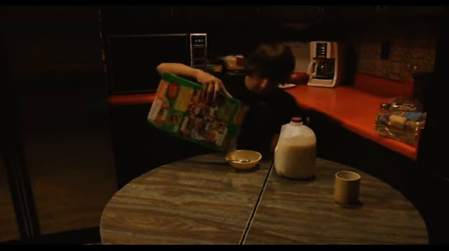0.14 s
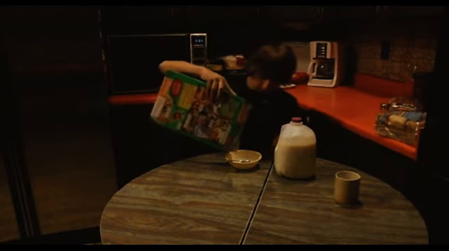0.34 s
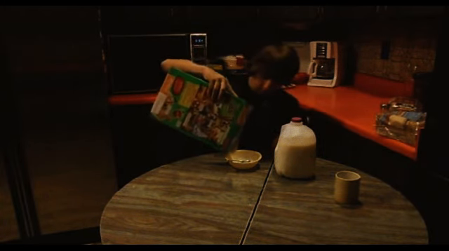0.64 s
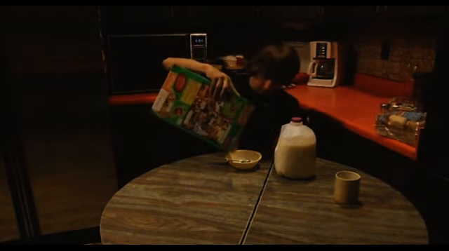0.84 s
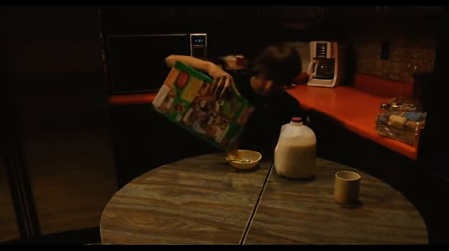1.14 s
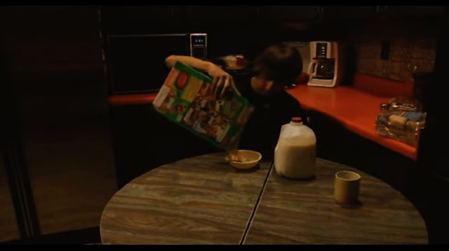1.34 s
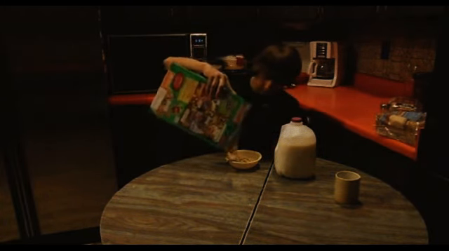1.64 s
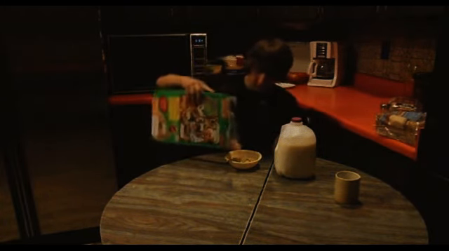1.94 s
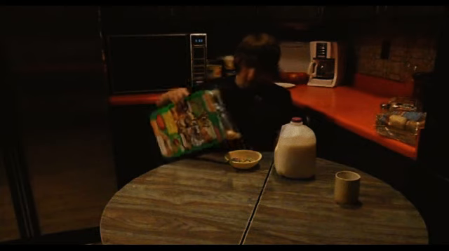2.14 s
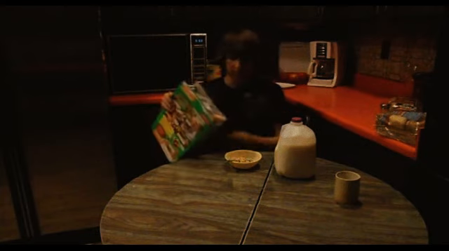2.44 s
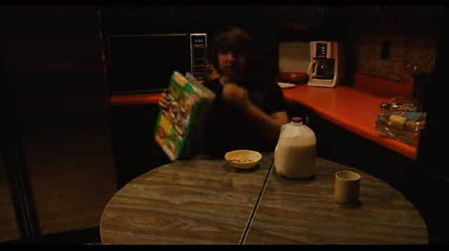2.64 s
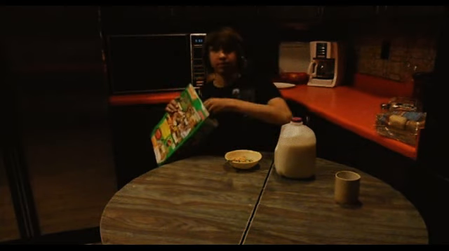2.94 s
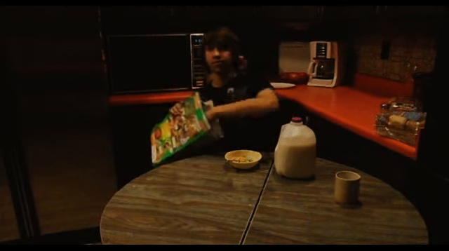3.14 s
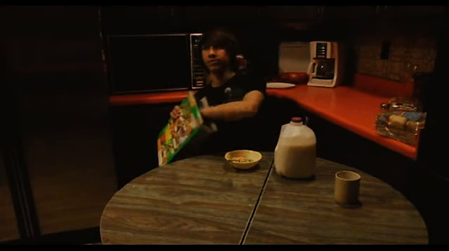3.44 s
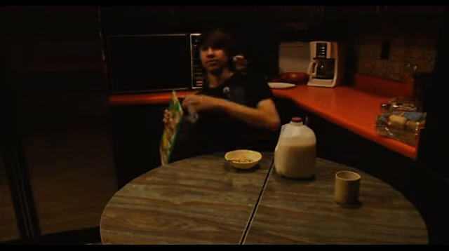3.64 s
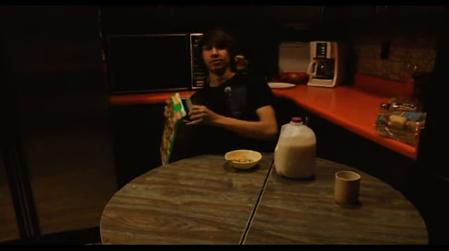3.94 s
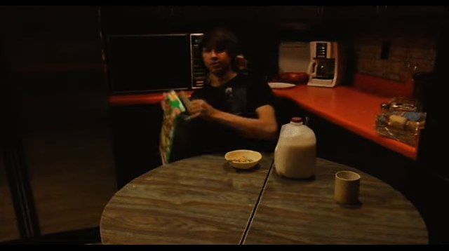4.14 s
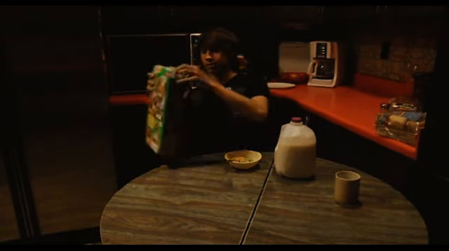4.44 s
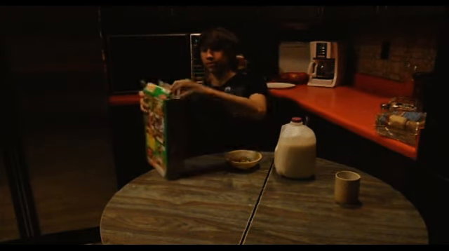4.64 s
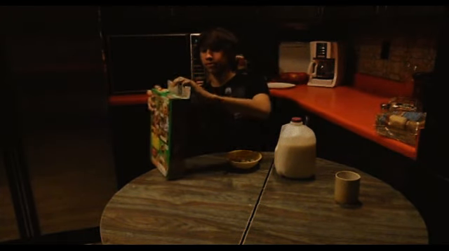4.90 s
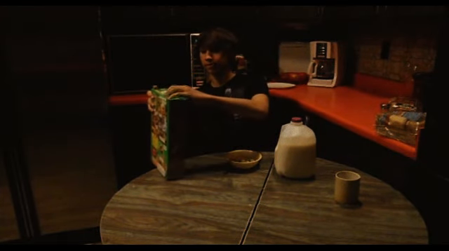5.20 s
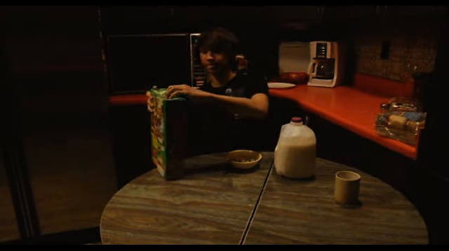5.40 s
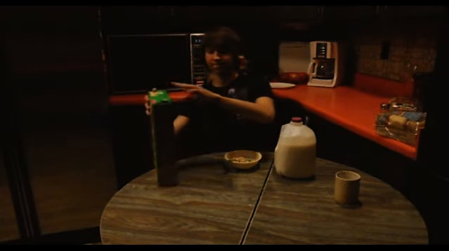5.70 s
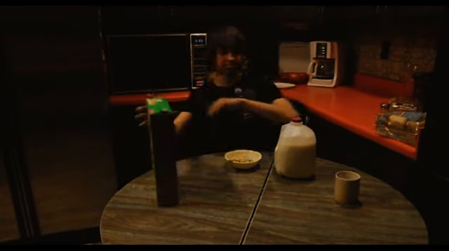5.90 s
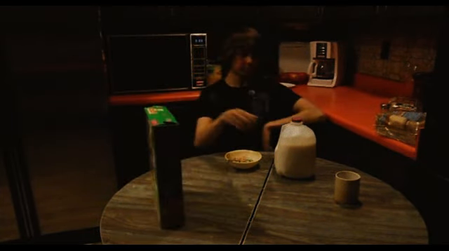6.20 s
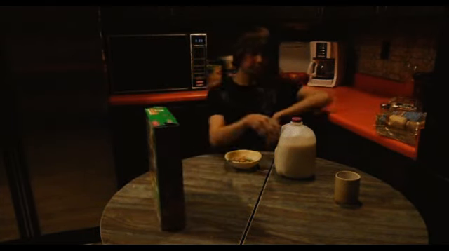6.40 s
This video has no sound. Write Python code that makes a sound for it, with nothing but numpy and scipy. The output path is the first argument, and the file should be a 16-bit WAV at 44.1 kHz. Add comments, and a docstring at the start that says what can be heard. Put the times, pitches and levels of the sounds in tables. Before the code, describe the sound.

In a small kitchen, dry cereal slides down a cardboard box in uneven shakes, pattering and clinking into a ceramic bowl. The stiff liner bag rustles and crackles, the box is tapped, then knocked hard on the table with an overloaded crack. Flaps pop shut, the box scrapes aside, and a steady, bright ringing hiss begins abruptly. The microphone is fairly near, with short room reflections.

```python
"""Cereal poured into a bowl

Dry cereal slides from a cardboard box and patters into a small ceramic bowl in a kitchen.
The liner bag is rustled back in, the box is knocked down on the table, shut and pushed aside.
A bright, ringing hiss sets in at the end. Random small impacts excite the cardboard, heap, bag and bowl;
short decaying modes give bowl, box, flaps and table their pitch. The sum clips at full scale."""
import sys
import numpy as np
from scipy import signal
from scipy.fft import rfft, irfft
from scipy.io import wavfile

SR = 44100
rng = np.random.default_rng(int(sys.argv[2]) if len(sys.argv) > 2 else 0)


def int16_out(signal):
    """Quantize to a 16-bit WAV file."""
    q = np.round(np.clip(np.atleast_2d(signal).T, -1, 1) * 32767)
    wavfile.write(sys.argv[1], SR, q.astype(np.int16))


N = 289279

# The stream of cereal onto the heap. Each row: time in seconds, relative patter level in dB.
STREAM = [(0, -29), (.09, -31), (.14, -46), (.25, -31.5), (.35, -34), (.45, -34), (.55, -36.5),
          (.72, -31.5), (.83, -37), (1.05, -32), (1.35, -28), (1.8, -31.5), (2.2, -30.5), (2.45, -45)]
# Shakes that send cereal down the box. Each row: start in seconds, length in seconds, slide level in dB.
SHAKES = [(-.03, 0.098, -25.5), (0.549, 0.029, -33), (0.7, 0.055, -33), (0.843, 0.044, -29.5),
          (1.026, 0.038, -32), (1.21, 0.034, -29.5), (1.86, 0.047, -49), (2.262, 0.091, -34)]
# Dull noise of moving arms and box. Each row: time in seconds, relative level in dB.
MOVEMENT = [(0.0, -44), (0.38, -55.5), (0.86, -49), (1.66, -57.5), (2.78, -41.5), (3.87, -52.5),
            (4.05, -45), (4.62, -47.5), (4.82, -54), (6.56, -39.5)]
# Clumps landing in the bowl. Each row: time in seconds, settling time in seconds, relative crunch in dB,
# relative ring in dB, how far the spot struck favours the lowest mode in dB, rough pitch of that mode in Hz.
LANDINGS = [(0.1099, 0.0032, 4.5, -18.5, 6.5, 3040), (0.1562, 0.004, -3, -21.5, -1, 2970),
            (0.1829, 0.0064, -3, -27, 9.5, 3080), (0.5799, .005, -7, -25.5, 3, 3190),
            (0.8529, 0.0088, 1.5, -16, 3, 3070), (0.8599, 0.0073, -2, -25, 9.5, 3057),
            (0.9044, 0.018, -7, -21.5, 3, 3100), (0.9914, 0.0052, 0, -17.5, 2, 3080),
            (1.1246, 0.0041, -1, -16.5, 4.5, 3110), (1.1967, 0.0082, -7.5, -24.5, 4, 3160),
            (1.228, 0.009, -20, -31, 0, 3220), (1.28, 0.007, -18, -15, 6, 3076),
            (1.289, 0.015, 3, -17.5, 8, 3040), (1.3137, 0.0087, -8, -24, 0, 3070),
            (1.325, 0.0073, -9, -25, -1, 3200), (1.3766, 0.024, -16, -25, 2, 3330),
            (1.455, 0.014, -3, -20, 1.5, 3120), (1.4658, 0.015, -8, -20.5, -1.5, 3130),
            (1.481, 0.038, -4, -21, 3, 3320), (1.557, 0.011, -13, -27, 3, 3200),
            (1.6138, .005, -9, -29, -1, 3220), (1.6575, 0.023, -6.5, -26.5, 3, 3050),
            (1.6834, 0.018, -6, -23.5, 2.5, 3400), (1.808, 0.0058, -13, -27.5, 3, 3170),
            (1.853, 0.008, -6, -27.5, 5, 3080), (1.88, 0.0067, -16, -29, 2, 3320),
            (2.277, 0.003, -4.5, -24, 1, 3250), (2.3133, 0.006, -15, -32, -4, 3180),
            (4.693, 0.0067, -18, -34, -7, 3040), (4.744, 0.024, -27, -46, 10, 3040)]
# Bowl modes, damped by the heap. Each row: frequency in Hz, relative level in dB, t60 in seconds,
# group (0 lowest, 1 second, 2 upper modes). Landings vary the pitch and t60.
BOWL_MODES = [(3080, -5, 0.062, 0), (3108, -13, 0.05, 0), (3260, -21.5, 0.055, 0), (3350, -24, 0.043, 0),
              (4250, -6.5, 0.11, 1), (4796, 1, 0.11, 1), (4810, -7.5, 0.065, 1), (5930, -23, 0.051, 2),
              (6853, -0.5, 0.096, 2), (6770, -7.5, 0.063, 2), (8600, -22, 0.067, 2),
              (9110, -11.5, 0.094, 2)]
# Sharp cracks of flakes, bag and box, and the overloaded crackle of the big knock.
# Each row: time in seconds, relative level in dB, centre in Hz.
CRACKS = [(0.185, -1.5, 6450), (.3076, -19, 7100), (0.3653, -15, 6940), (0.3883, -5, 7000),
          (0.397, -7, 6160), (0.454, -20, 5000), (0.645, -12.5, 6040), (0.715, -8, 6130),
          (.9112, -12, 6000), (0.926, -16, 7500), (1.018, -9, 4500), (1.124, -8, 7500), (1.3278, 1, 6100),
          (1.391, -2.5, 6050), (1.4964, -4, 6000), (1.664, -10, 6540), (2.0065, -15.5, 4500),
          (2.095, -15, 4500), (2.313, -9, 7150), (2.5853, 1.5, 3980), (2.762, -14, 2500), (2.869, -4, 3000),
          (2.896, 1.5, 3500), (3.0289, 3.5, 3750), (3.068, 0, 4530), (3.1138, -3, 4630), (3.131, -10, 3000),
          (3.159, -4, 3500), (3.338, 2.5, 3530), (3.388, 1, 3000), (3.2351, 1.5, 2610), (3.268, 1.5, 5600),
          (3.5669, -10, 3480), (3.625, -0.5, 3130), (3.642, -4, 3480), (3.8353, -7, 3500),
          (3.9383, -6.5, 5000), (4.0415, -10, 2990), (4.0767, -18, 3000), (4.1596, -2, 4030),
          (4.6741, 7.5, 6900), (5.043, -17, 4600), (5.495, -18, 4440)]
# Brief faint whistles, swishes and scuffs of sliding cereal and rubbed box. Each row: time of the middle
# in seconds, time from there to 1/e in seconds, pitch at the middle in Hz, width in Hz,
# level at the middle in dB, glide in Hz per second.
WHISTLES = [(1.917, 0.16, 1245, 101, -39, 0), (2.03, 0.04, 1800, 130, -36, 498),
            (2.128, 0.058, 1850, 75, -29.5, 250), (2.233, 0.077, 1796, 180, -34.5, -900),
            (2.173, 0.16, 3310, 600, -36, 0), (2.172, 0.15, 4490, 500, -37, -600),
            (2.809, 0.047, 830, 200, -27, 0), (3.894, 0.024, 728, 403, -28.5, 0),
            (4.401, 0.11, 1288, 690, -31, 0), (4.658, 0.018, 1197, 900, -21.5, -4),
            (5.697, 0.033, 554, 100, -23, 500), (5.721, 0.054, 1034, 190, -26, 600)]
# Movements of the hands on box and liner. Each row: start in seconds, length in seconds,
# relative rub in dB, relative crinkle in dB.
HAND_STROKES = [(2.495, .08, -27, -27), (2.562, 0.093, -25, -19.5), (2.643, 0.088, -22.5, -20),
                (2.854, 0.07, -21.5, -17.5), (3.023, 0.029, -24.5, -19), (3.109, 0.023, -24, -18.5),
                (3.217, 0.18, -28, -16.5), (3.289, 0.058, -21.5, -8.5), (3.577, 0.062, -37.5, -25),
                (3.841, 0.071, -28, -26), (4.151, 0.026, -27.5, -23), (4.287, 0.17, -29.5, -35.5),
                (4.487, 0.12, -29.5, -32.5), (4.608, 0.02, -25, -22.5), (4.955, 0.078, -37, -49),
                (5.141, 0.09, -32, -40), (5.33, 0.41, -39.5, -48)]
# Standing waves of the hollow box. Each row: frequency in Hz, relative strength in dB.
CAVITY_WAVES = [(463, -6.5), (515, -5.5), (555, 1.5), (660, 0.5), (722, -6), (812, 0.5), (930, -4),
                (1055, -7), (1150, -1.5), (1535, -0.5), (1970, -5), (2408, -5.5)]
# Blows on the box. Each row: time in seconds, slap of the cardboard in dB, snap of its edge in dB,
# boom of its walls in dB.
KNOCKS = [(2.7615, -17, -41, -22.5), (2.779, -21, -35, -31), (3.3904, -23.5, -35, -20.5),
          (4.1585, -21, -22.5, -38), (4.177, -22, -25, -49), (4.354, -20.5, -29.5, -41),
          (4.3751, -21.5, -32, -36), (4.4105, -16, -33, -32), (4.45, -23.5, -35, -38),
          (4.6271, -20, -27, -34), (4.675, -6, -10.5, -8.5), (4.6836, -15.5, -24, -11),
          (4.695, -23, -39, -15.5), (4.964, -30.5, -38, -59)]
# Box modes, retuned a little at each blow. Each row: rough frequency in Hz, relative level in dB,
# t60 in seconds.
BOX_MODES = [(290, -6.5, 0.052), (429, -6, 0.1), (464.4, 10, 0.056), (540, 0.5, 0.042), (727, 6, 0.19),
             (1190, 4, 0.099), (1260, -30, 0.097), (1994, -13, 0.099)]
# Table top modes. Each row: frequency in Hz, relative level in dB, t60 in seconds.
TABLE_MODES = [(42, -2, .06), (88, 7, 0.041), (119, 3, 0.19), (182, 3, 0.28), (253, 6, 0.056)]
# Lid flaps pressed shut. Each row: time in seconds, hollow pock in dB, snap of the edge in dB.
FLAP_PRESSES = [(5.1834, -13.5, -17.5), (5.344, -29, -38.5), (5.633, -18.5, -19.5), (5.692, -22, -20)]
# Flap modes. Each row: frequency in Hz, relative level in dB, t60 in seconds.
FLAP_MODES = [(347, -16, 0.35), (480, -1, 0.066), (518, 6, 0.066), (757, -3, 0.13), (985, -5, .06),
              (1090, -9, 0.089), (1556, -4, 0.059), (1680, -16, 0.074), (2320, -14, 0.05)]
# Box pushed over the table, then the arm brushing back. Each row: time in seconds, relative scraping in dB.
PUSH = [(5.76, -31.5), (5.85, -22.5), (5.95, -20), (6.07, -24.5), (6.22, -25.5), (6.35, -30)]
# Narrow resonances of the closing hiss. Each row: frequency in Hz, width in Hz, relative level in dB.
HISS_PEAKS = [(1228, 34, -1), (1726, 29, 0), (2040, 55, -2), (2500, 74, -4), (2920, 54, -2), (3020, 35, -7),
              (3733, 14, 3.5), (4030, 47, 2), (4300, 81, -3), (4850, 48, 2.5), (5420, 33, 0),
              (5940, 80, -15), (6160, 47, -2), (6700, 90, -12), (7470, 66, 0), (8700, 130, -13),
              (9150, 80, -12)]

# Spectrum of drumming box walls. Each row: frequency in Hz, relative level in dB.
CARDBOARD_COLOUR = [(60, -65), (150, -28), (300, -10.5), (470, -1), (620, -1), (800, 0), (1200, -2),
                    (1700, -2.5), (2400, -8.5), (4000, -12.5), (9000, -40), (12000, -103)]
# Filter curve for the patter on the heap, with little above 10 kHz.
# Each row: frequency in Hz, relative level in dB.
HEAP_COLOUR = [(100, -39), (800, -4.5), (1800, -3.5), (2600, -1.5), (3400, 4), (4200, 2.5), (6000, -1.5),
               (7500, -9.5), (10000, -21), (11000, -64), (15000, -59)]
# Spectrum of dull arm noise. Each row: frequency in Hz, relative level in dB.
RUMBLE_COLOUR = [(25, -10), (90, -14.5), (140, -1.5), (185, 8.5), (260, 6), (400, 6.5), (900, -25),
                 (3000, -59)]
# Filter curve for crunching clumps. Each row: frequency in Hz, relative level in dB.
CRUNCH_COLOUR = [(100, -50), (600, 1), (1500, 6.5), (2500, 4.5), (4000, 0), (6000, 3.5), (7500, -4),
                 (10000, -1.5), (15000, -114)]
# Filter curve for cracking ticks. Each row: frequency in Hz, relative level in dB.
TICK_COLOUR = [(300, 6), (3000, -1), (6000, -3), (9500, -10.5), (11000, -32), (15000, -49)]
# Filter curve for the crinkling liner. Each row: frequency in Hz, relative level in dB.
CRINKLE_COLOUR = [(100, -45), (700, -18), (1500, -2.5), (2200, 1.5), (3300, 1), (4800, 0.5), (6500, -7.5),
                  (8500, -13.5), (10000, -29), (15000, -71)]
# Filter curve for slapped cardboard. Each row: frequency in Hz, relative level in dB.
SLAP_COLOUR = [(80, -28), (150, -13.5), (330, -10), (500, 1), (750, 5.5), (1100, 5.5), (1350, 0.5),
               (1650, 2.5), (2400, -5), (4000, -10.5), (9000, -55), (12000, -81)]
# Filter curve for a snapping edge. Each row: frequency in Hz, relative level in dB.
SNAP_COLOUR = [(100, -35), (600, -8), (1800, -1), (2700, 1.5), (5000, -3), (7500, -13.5), (10000, -29.5),
               (15000, -81)]
# Filter curve for the scrape on the table. Each row: frequency in Hz, relative level in dB.
SCRAPE_COLOUR = [(100, -58), (700, -20), (1600, -6.5), (2800, -1.5), (4500, 1), (6000, -5), (8000, -10),
                 (10000, -24), (15000, -42)]
# Filter curve for the closing hiss. Each row: frequency in Hz, relative level in dB.
HISS_COLOUR = [(80, -63), (300, -15), (900, -5), (1700, -3), (2600, -1), (4000, -2.5), (5200, -7),
               (6200, -9), (7400, -8), (8300, -20), (10000, -37), (15000, -37)]

T = np.arange(N) / SR
AGE = T[:SR // 3]  # time since a hit, s

KITCHEN_T60_S, KITCHEN_DB = 0.28, 7.5  # echo energy relative to the direct sound
NEAR_T60_S, NEAR_DB = 0.033, 2.5  # table top, counter and near walls answer quickly
STROKE_ATTACK_S, STROKE_RELEASE_S = 0.018, 0.089  # linear rise, time constant of the decay
SLIDE_DB = -6  # steady sliding in the box, relative to the stream
SHAKE_PATTER_DB = 0.5  # extra patter that a shake brings, relative to its slide
PATTER_DB, PING_DB = -3.0, -18.5  # pieces on the heap, stray pieces on the bowl
ARMS_DB, SHUDDER_DB = 3.5, -17.5  # relative to the movement
LEAN_S, LEAN_LENGTH_S, LEAN_DB = 2.5, 0.077, -54  # the table shudders as it is leant on
BOWL_DIRECT_DB = -9.5  # extra direct sound from the bowl
UPPER_RING_DB = -6  # upper modes relative to the ring
RING_TRIM_DB, CRUNCH_TRIM_DB, CRACK_TRIM_DB = -4.0, -23.5, -24.0
# the hands never quite rest: a light rub from taking hold until the box has been pushed aside,
# more rub and crinkle until the bag is in
GRIP_S, BAG_IN_S, PUSHED_S = 2.42, 4.66, 6.2
GRIP_RUB_DB, BAG_RUB_DB, BAG_CRINKLE_DB, GRIP_CRINKLE_DB = -40, -35, -32.5, -43.5
CRACKLE_MAX_DB = 6  # ceiling on the crackle before its trim
BUCKLE_DB, CRUMPLE_DB, CRINKLE_DB = -2.5, -13.0, -4.5
CAVITY_WIDTH_HZ, CAVITY_TRIM_DB = 11.8, -1.08
KNOCK_SETTLE_S, SNAP_SETTLE_S = 0.015, 0.0023  # how long walls and edge keep making contact
THUMP_S, THUMP_DB = 4.675, -20  # the table top under the big knock
FLAP_SETTLE_S, FLAP_DIRECT_DB = 0.0081, -2
FLAP_PAPER_DB = -6  # papery slap of a flap relative to its pock
PUSH_RUB_DB, PUSH_RUB_SHARE = -27.5, 0.46  # rub at the mean scrape; its dB per dB of scrape
HISS_S, HISS_DB, HISS_RING_DB = 6.357, -24, -23
TOP_HZ = 15700


def undb(db):
    """Decibels to gain."""
    return 10 ** (np.asarray(db) / 20)


def unit(x):
    """Scale to unit energy."""
    return x / np.sqrt(np.sum(x ** 2) + 1e-18)


def level(x, db):
    """Scale to an rms level."""
    return unit(x) * np.sqrt(len(x)) * undb(db)


def burst(x, db):
    """Scale a hit to the rms level it would have if packed into one fiftieth of a second."""
    return unit(x) * np.sqrt(SR / 50) * undb(db)


def through(x, response):
    """Pass a sound through an impulse response."""
    return signal.fftconvolve(x, response)[:len(x)]


def add(out, s, x):
    """Mix a sound in at a time in seconds."""
    i = max(int(s * SR), 0)
    out[i:i + len(x)] += x[:N - i]


def gains(table):
    """The dB column of a (time, dB) curve as a gain that fades just outside its span."""
    s, db = np.transpose(table)
    outside = np.maximum(s[0] - T, 0) + np.maximum(T - s[-1], 0)
    return undb(np.interp(T, s, db)) * np.exp(-outside / 0.037)


def colour(points, size=2048):
    """Short causal response with a spectrum of (Hz, dB) points, made minimum-phase by its cepstrum."""
    hz, db = np.transpose(points)
    bins = np.maximum(np.arange(size // 2 + 1) * SR / size, 1)
    curve_db = np.interp(np.log(bins), np.log(hz), db)
    cepstrum = irfft(np.log(undb(curve_db)))
    cepstrum[1:size // 2] *= 2
    cepstrum[size // 2 + 1:] = 0
    return unit(irfft(np.exp(rfft(cepstrum))))


def fade(t60):
    """Exponential decay by 60 dB in t60 seconds."""
    return np.exp(-np.log(1000) * AGE / t60)


def mode(hz, t60):
    """One decaying resonance; a small body radiates little below its pitch."""
    ring = np.sin(2 * np.pi * hz * AGE) * fade(t60)
    pole = np.exp(-np.pi * hz / SR)
    return unit(signal.lfilter([1, -2, 1], [1, -2 * pole, pole ** 2], ring))


def grains(per_s, spread_db):
    """Random tiny impacts of uneven size, rms 1."""
    sizes = undb(spread_db * np.clip(rng.standard_normal(N), -2, 2)) * rng.choice([-1, 1], N)
    return level(sizes * (rng.random(N) < per_s / SR), 0)


def clump(settle_s, per_s, follow_db):
    """A first contact and the smaller ones that tumble after it."""
    hits = rng.standard_normal(len(AGE)) * (rng.random(len(AGE)) < per_s / SR)
    contacts = undb(follow_db) * unit(hits * np.exp(-AGE / max(settle_s, .001)))
    contacts[0] += 1
    return contacts


def kitchen(contacts):
    """Contacts and their reflections; each comes from a new spot, so the echoes form a dense, even wash."""
    tail = fade(KITCHEN_T60_S) * (1 - np.exp(-AGE / 0.00043))
    room_energy = (undb(KITCHEN_DB) * unit(tail)) ** 2
    near_energy = (undb(NEAR_DB) * unit(fade(NEAR_T60_S))) ** 2
    echoes = room_energy + near_energy
    wash = np.sqrt(np.abs(through(contacts ** 2, echoes))) * rng.standard_normal(len(contacts))
    return (contacts + wash) / np.sqrt(1 + np.sum(echoes))


def stroke(start_s, length_s):
    """One movement: it gathers speed, holds and dies away."""
    rise = np.clip((T - start_s) / STROKE_ATTACK_S, 0, 1)
    return rise * np.exp(-np.clip((T - start_s - length_s) / STROKE_RELEASE_S, 0, 20))


def cardboard(drive):
    """Countless small contacts drum on the walls of the box."""
    return through(kitchen(drive * grains(per_s=2500, spread_db=2.5)), colour(CARDBOARD_COLOUR))


def pouring():
    """Cereal slides down the box and patters on the heap, more at each shake; stray pieces ping the bowl."""
    stream = gains(STREAM)
    shakes = sum(undb(db) * stroke(s, length) for s, length, db in SHAKES)
    slide = np.hypot(undb(SLIDE_DB) * stream, shakes)
    flow = np.hypot(stream, undb(SHAKE_PATTER_DB) * shakes)
    pieces = kitchen(flow * grains(per_s=380, spread_db=6))
    patter = through(pieces, colour(HEAP_COLOUR))
    strays = flow * grains(per_s=40, spread_db=3)
    bowl = unit(sum(undb(db) * mode(hz, t60) for hz, db, t60, _ in BOWL_MODES))
    pings = through(strays + kitchen(strays), bowl)
    return cardboard(slide) + undb(PATTER_DB) * patter + undb(PING_DB) * pings


def rumble():
    """Low, dull noise and a deep shudder follow the movement at the table."""
    moving = gains(MOVEMENT)
    arms = undb(ARMS_DB) * moving * through(rng.standard_normal(N), colour(RUMBLE_COLOUR))
    deep_band = signal.butter(2, [22, 70], "band", fs=SR, output="sos")
    deep = signal.sosfilt(deep_band, rng.standard_normal(N))
    lean = undb(LEAN_DB) * np.exp(-((T - LEAN_S) / LEAN_LENGTH_S) ** 2)
    return arms + (undb(SHUDDER_DB) * moving + lean) * level(deep, 0)


def landings():
    """Clumps tumble in flake by flake, crunching and pinging; where each strikes decides which modes speak."""
    out, crunch = np.zeros(N), colour(CRUNCH_COLOUR)
    for s, settle_s, crunch_db, ring_db, favour_db, lowest_hz in LANDINGS:
        strikes = clump(settle_s, per_s=900, follow_db=5.0)
        # the open bowl beams its strikes at the microphone
        flakes = undb(BOWL_DIRECT_DB) * strikes + kitchen(strikes)
        group_db = ring_db + np.array([favour_db, -favour_db, UPPER_RING_DB])
        group_pitch = [lowest_hz / BOWL_MODES[0][0], 1, 1]
        for hz, db, t60, group in BOWL_MODES:
            g = int(round(group))
            # the shifting load of cereal detunes and damps the modes differently each time
            detune, damping, weight_db = rng.standard_normal(3) * [0.004, 0.15, 1.2]
            ring = through(flakes, mode(hz * group_pitch[g] * (1 + detune), t60 * np.exp(damping)))
            add(out, s, burst(ring, db + weight_db + group_db[g] + RING_TRIM_DB))
        add(out, s, burst(through(flakes, crunch), crunch_db + CRUNCH_TRIM_DB))
    return out


def cracks():
    """Each crack, or the crackle of the overloaded knock, is a quick run of tiny impulses: one bright tick."""
    out, tick = np.zeros(N), colour(TICK_COLOUR)
    for s, db, hz in CRACKS:
        impulses = clump(.0015, per_s=9000, follow_db=8)
        # sharp ticks beam straight at the microphone as well as round the room
        heard = undb(-2) * impulses + kitchen(impulses)
        pitched = through(heard, mode(hz, 0.00086))
        add(out, s, burst(through(pitched, tick), db + CRACK_TRIM_DB))
    return out


def whistles_and_scuffs():
    """Sliding cereal and rubbed box swell briefly into a faint band of noise round a pitch that may glide."""
    out, t = np.zeros(N), np.arange(-SR // 3, SR // 3) / SR
    for s, length, hz, width_hz, db, glide in WHISTLES:
        lowpass = signal.butter(2, width_hz / 2, fs=SR, output="sos")
        waver = signal.sosfilt(lowpass, rng.standard_normal((2, len(t))))
        phase = 2 * np.pi * (hz * t + glide * t ** 2 / 2)
        tone = waver[0] * np.cos(phase) + waver[1] * np.sin(phase)
        add(out, s + t[0], level(tone, db) * np.exp(-(t / length) ** 2))
    return out


def handling():
    """Hands rub the box; the liner crinkles finely and a few stiff creases buckle with a louder crackle."""
    holds = [(GRIP_S, PUSHED_S - GRIP_S, GRIP_RUB_DB, GRIP_CRINKLE_DB),
             (GRIP_S, BAG_IN_S - GRIP_S, BAG_RUB_DB, BAG_CRINKLE_DB)]
    energy = np.zeros((2, N))
    for s, length, rub_db, crinkle_db in list(HAND_STROKES) + holds:
        energy += np.outer(undb([rub_db, crinkle_db]), stroke(s, length)) ** 2
    rub, crinkle = np.sqrt(energy)
    creases = grains(per_s=2200, spread_db=6.5)
    buckles = grains(per_s=75, spread_db=3.5)
    # keep chance peaks of the crackle below a ceiling
    limit = undb(CRACKLE_MAX_DB)
    crackle = np.clip(crinkle * (creases + undb(BUCKLE_DB) * buckles), -limit, limit)
    crumple = through(kitchen(rub * buckles), colour(SLAP_COLOUR))
    liner = through(kitchen(crackle), colour(CRINKLE_COLOUR))
    return cardboard(rub) + undb(CRUMPLE_DB) * crumple + undb(CRINKLE_DB) * liner


def hollow(x):
    """The standing waves of the box lift narrow bands and ring on a little."""
    waves = np.zeros(N)
    for hz, db in CAVITY_WAVES:
        b, a = signal.iirpeak(hz, hz / CAVITY_WIDTH_HZ, fs=SR)
        waves += undb(db) * signal.lfilter(b, a, x)
    return undb(CAVITY_TRIM_DB) * (x + waves)


def knocks():
    """Blows slap the cardboard, snap on its edge and boom in the box; the big one shakes the table top."""
    out = np.zeros(N)
    snap, slap = colour(SNAP_COLOUR), colour(SLAP_COLOUR)
    for s, slap_db, snap_db, boom_db in KNOCKS:
        walls = kitchen(clump(KNOCK_SETTLE_S, per_s=5900, follow_db=-2))
        edge = kitchen(clump(SNAP_SETTLE_S, per_s=3000, follow_db=5))
        box = np.zeros(len(AGE))
        for hz, db, t60 in BOX_MODES:
            # grip and contents tune the walls a little differently at each blow
            tuned_hz = hz * (1 + 0.019 * rng.standard_normal())
            box += rng.choice([-1, 1]) * undb(db) * mode(tuned_hz, t60)
        add(out, s, burst(through(edge, snap), snap_db))
        add(out, s, burst(through(walls, slap), slap_db))
        # the broad wall faces the microphone, so half of its boom arrives directly
        boom = unit(box) + unit(through(walls, box))
        add(out, s, burst(boom, boom_db))
    table = sum(undb(db) * mode(hz, t60) for hz, db, t60 in TABLE_MODES)
    add(out, THUMP_S, burst(table, THUMP_DB))
    return out


def flaps():
    """Each flap snaps past its edge and gives a short, hollow pock with a papery slap."""
    out, snap, slap = np.zeros(N), colour(SNAP_COLOUR), colour(SLAP_COLOUR)
    flap = sum(undb(db) * mode(hz, t60) for hz, db, t60 in FLAP_MODES)
    for s, pock_db, snap_db in FLAP_PRESSES:
        press = kitchen(clump(FLAP_SETTLE_S, per_s=12000, follow_db=-6))
        edge = kitchen(clump(SNAP_SETTLE_S, per_s=2800, follow_db=4))
        pock = undb(FLAP_DIRECT_DB) * unit(flap) + unit(through(press, flap))
        add(out, s, burst(pock, pock_db))
        add(out, s, burst(through(edge, snap), snap_db))
        add(out, s, burst(through(press, slap), pock_db + FLAP_PAPER_DB))
    return out


def pushing():
    """The bottom of the box scrapes over the table in fine, dense slips; its walls drum along."""
    scrape = gains(PUSH)
    mean_scrape = undb(np.mean(PUSH, axis=0)[1])
    rub = undb(PUSH_RUB_DB) * (scrape / mean_scrape) ** PUSH_RUB_SHARE
    slips = grains(per_s=7000, spread_db=3)
    return cardboard(rub) + through(kitchen(scrape * slips), colour(SCRAPE_COLOUR))


def resonant_noise(hz, width_hz):
    """A resonance kept ringing by noise."""
    t60 = np.log(1000) / np.pi / width_hz
    return level(through(rng.standard_normal(N), mode(hz, t60)), 0)


def ringing_hiss():
    """A steady bright hiss with many narrow resonances starts abruptly."""
    ring = sum(undb(db) * resonant_noise(hz, width_hz) for hz, width_hz, db in HISS_PEAKS)
    hiss = through(rng.standard_normal(N), colour(HISS_COLOUR))
    onset = np.clip((T - HISS_S) / 0.0033, 0, 1)
    return (level(hiss, HISS_DB) + level(ring, HISS_RING_DB)) * onset


def scene():
    """All layers sum to one channel; only handling and pushing pass through the hollow of the box."""
    cereal = pouring() + landings() + cracks()
    box = whistles_and_scuffs() + hollow(handling() + pushing()) + knocks() + flaps()
    return (cereal + rumble() + box + ringing_hiss())[None]


def record(dry):
    """The sum clips at full scale; a low-pass softens the highest treble and a steep one ends it at TOP_HZ."""
    clipped = np.clip(dry, -1, 1)
    soft = signal.sosfilt(signal.butter(3, 11000, fs=SR, output="sos"), clipped)
    return signal.sosfilt(signal.ellip(8, .2, 70, TOP_HZ, fs=SR, output="sos"), soft)


dry = scene()
out = record(dry)
int16_out(out)
```